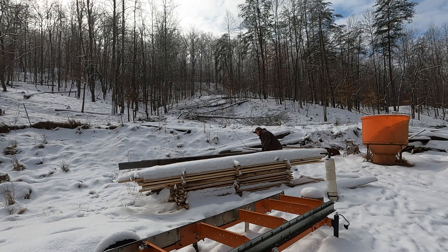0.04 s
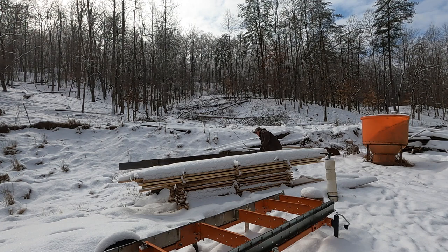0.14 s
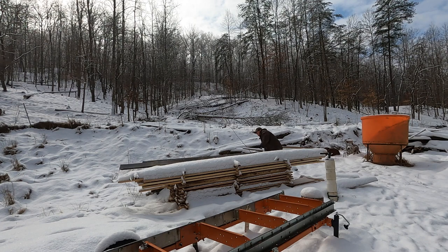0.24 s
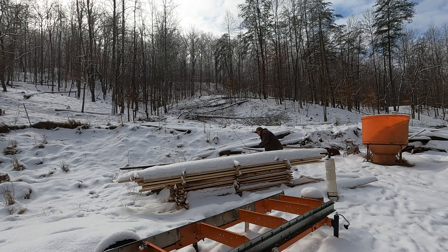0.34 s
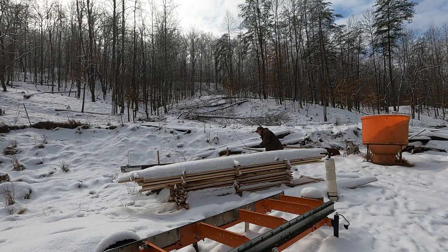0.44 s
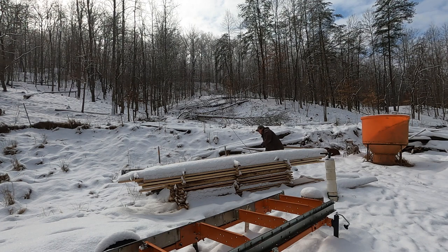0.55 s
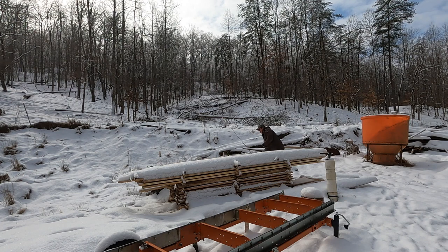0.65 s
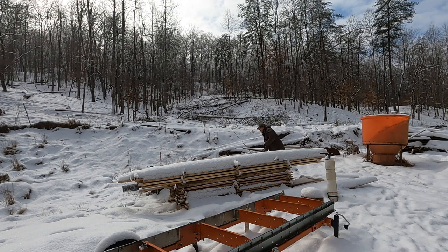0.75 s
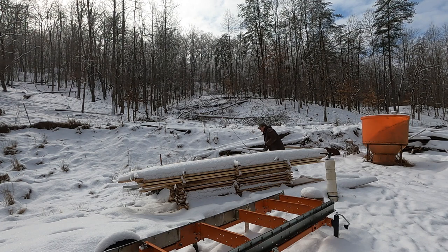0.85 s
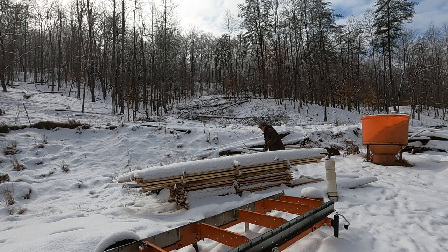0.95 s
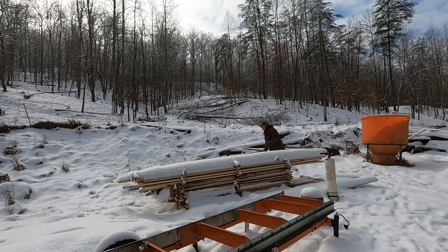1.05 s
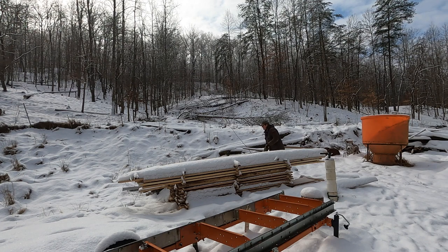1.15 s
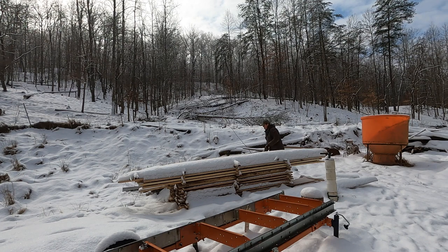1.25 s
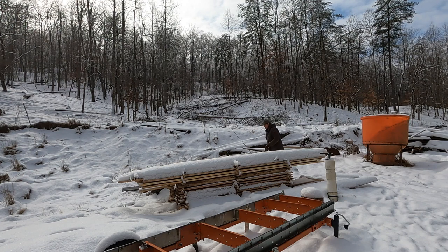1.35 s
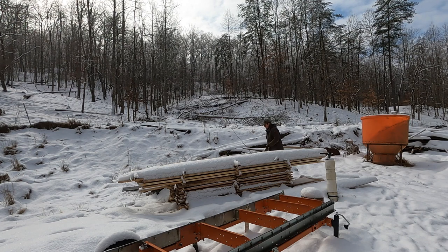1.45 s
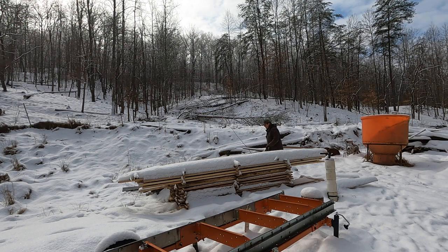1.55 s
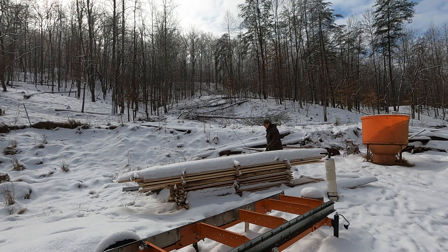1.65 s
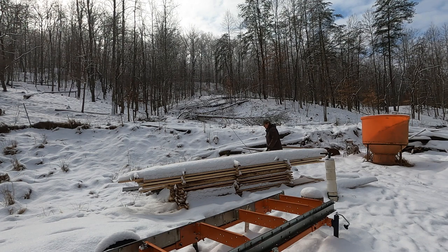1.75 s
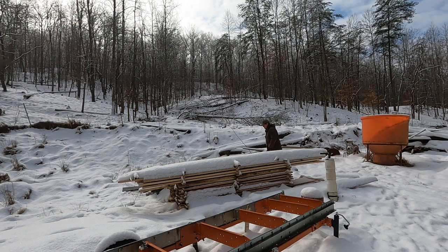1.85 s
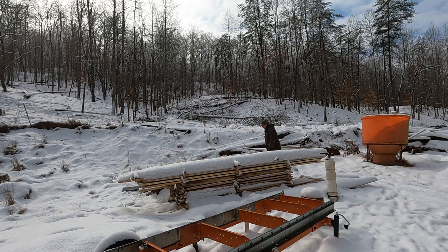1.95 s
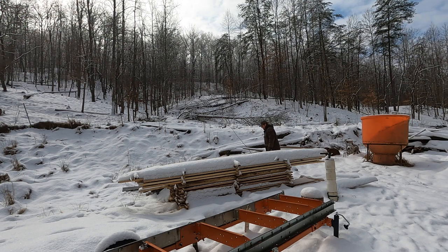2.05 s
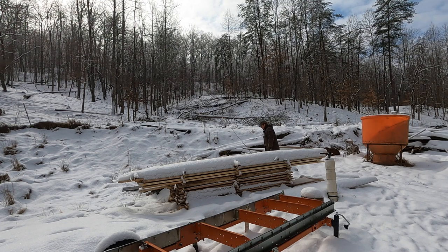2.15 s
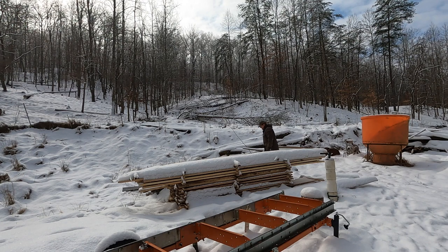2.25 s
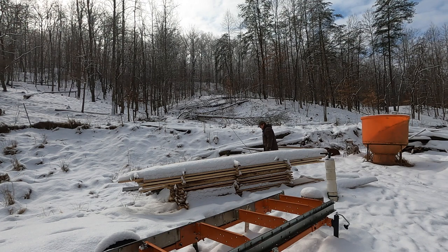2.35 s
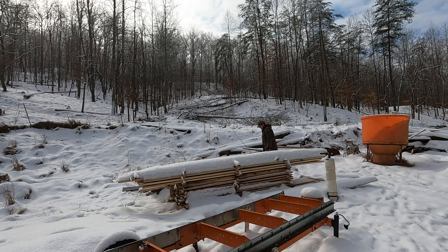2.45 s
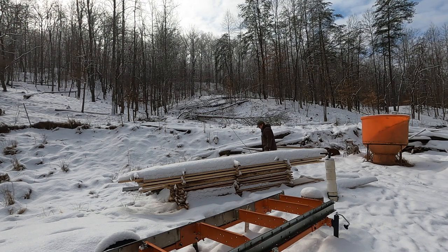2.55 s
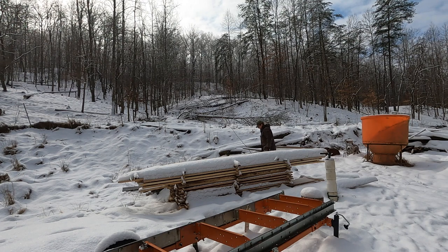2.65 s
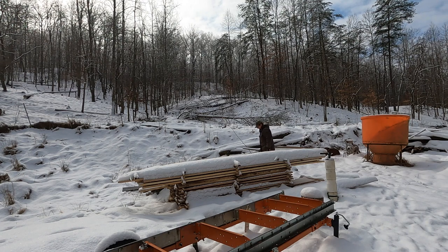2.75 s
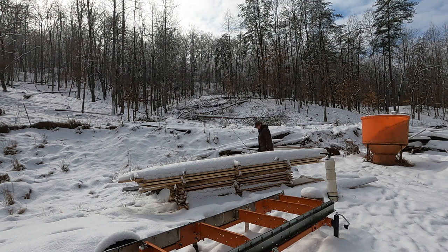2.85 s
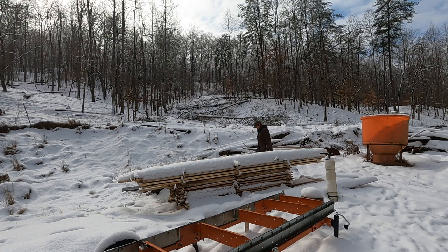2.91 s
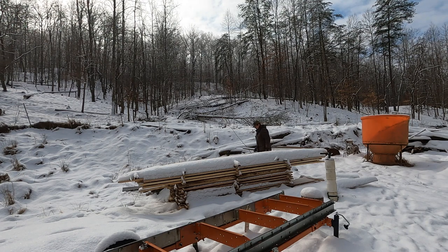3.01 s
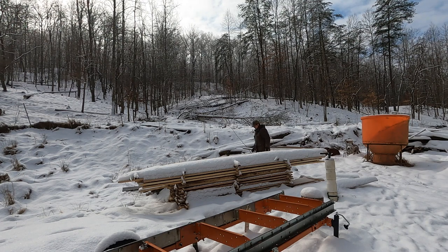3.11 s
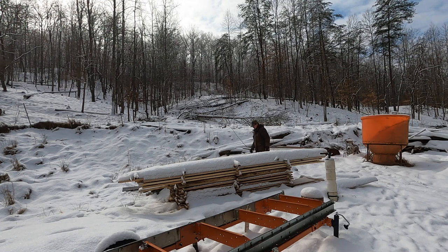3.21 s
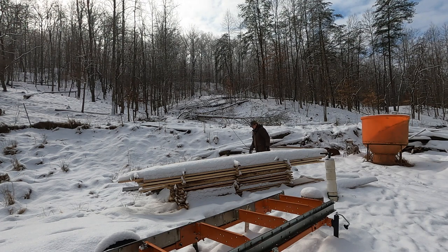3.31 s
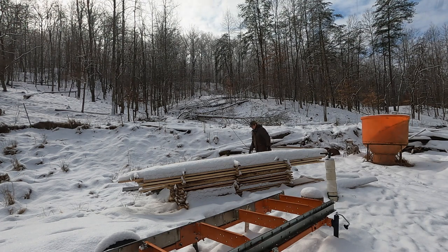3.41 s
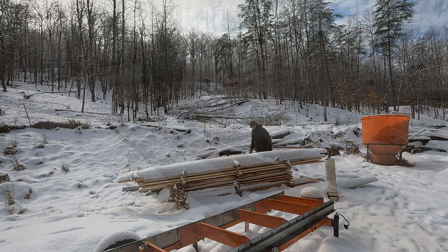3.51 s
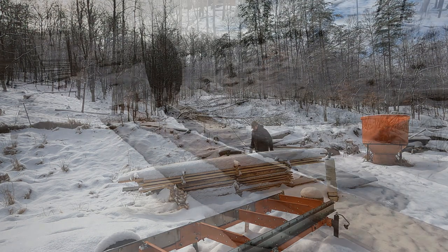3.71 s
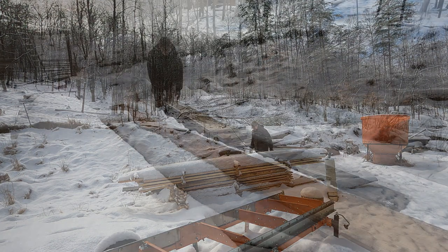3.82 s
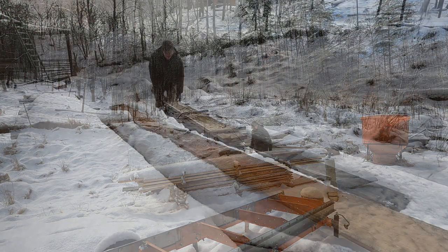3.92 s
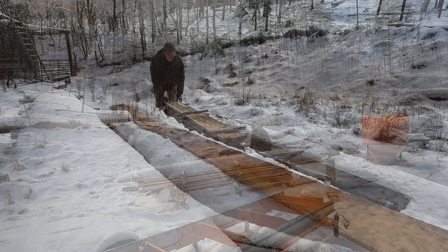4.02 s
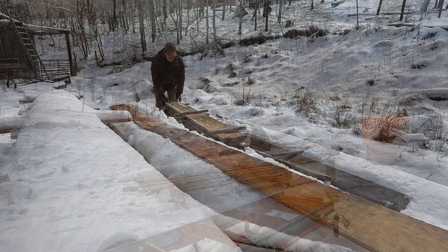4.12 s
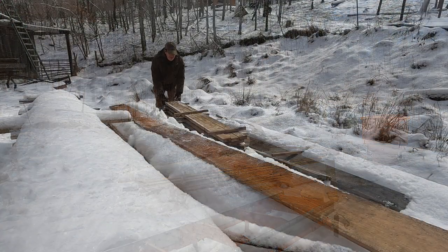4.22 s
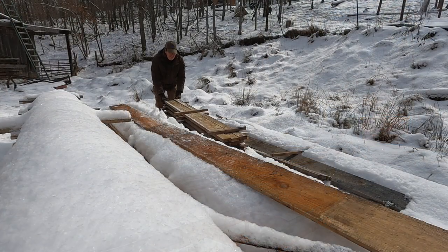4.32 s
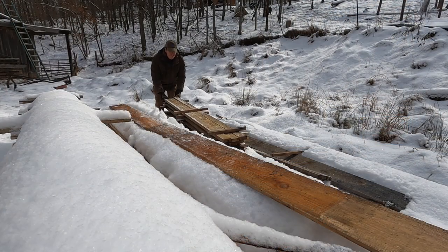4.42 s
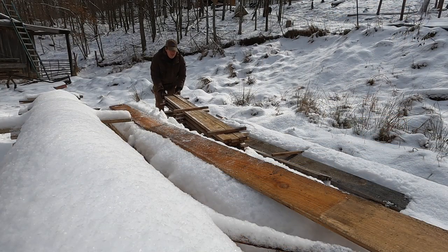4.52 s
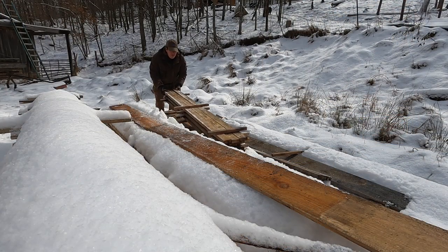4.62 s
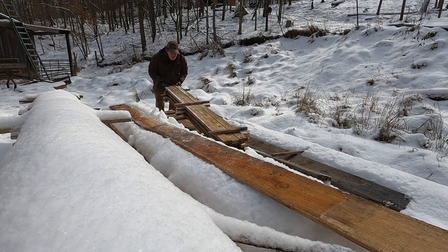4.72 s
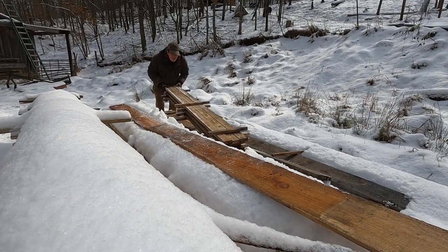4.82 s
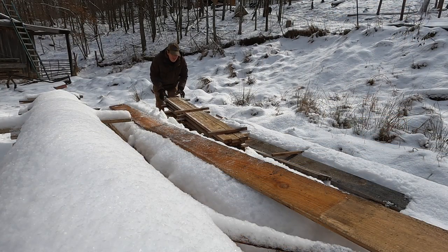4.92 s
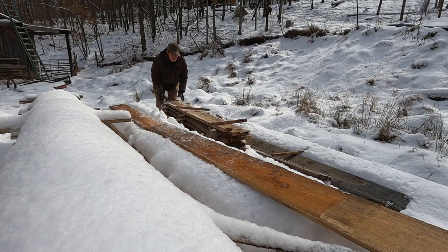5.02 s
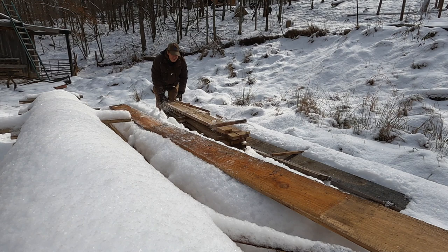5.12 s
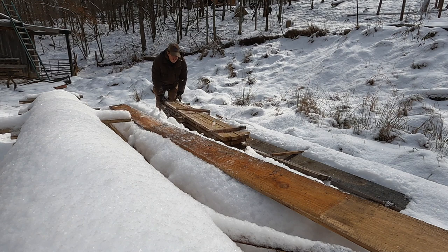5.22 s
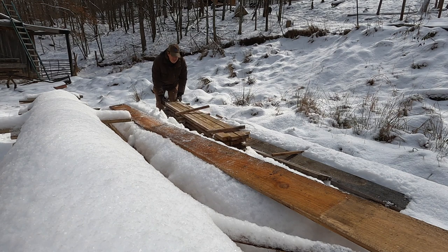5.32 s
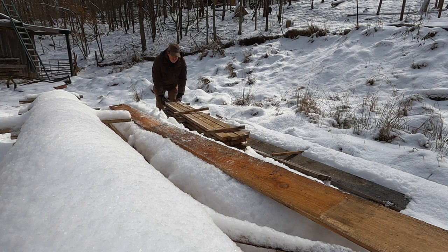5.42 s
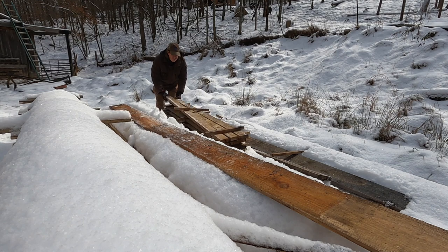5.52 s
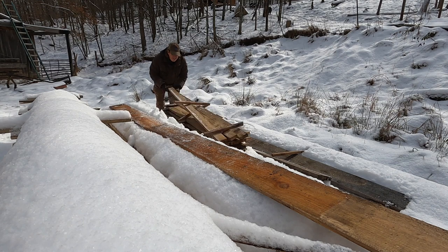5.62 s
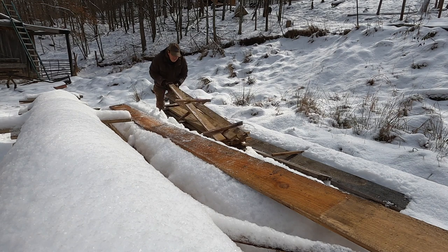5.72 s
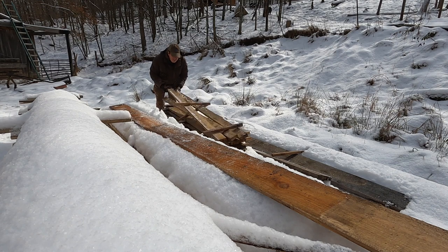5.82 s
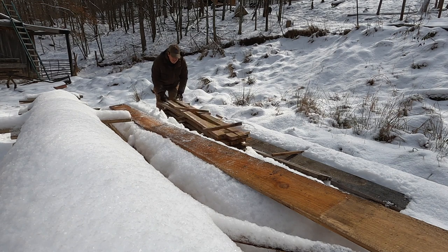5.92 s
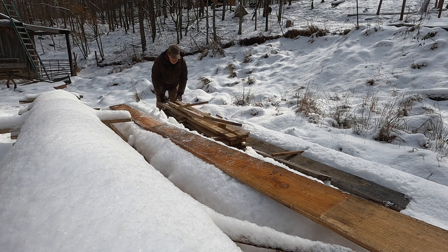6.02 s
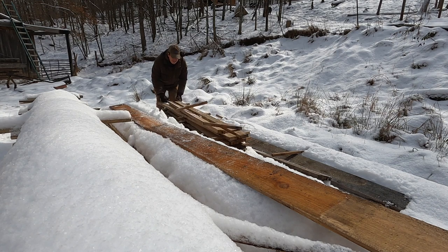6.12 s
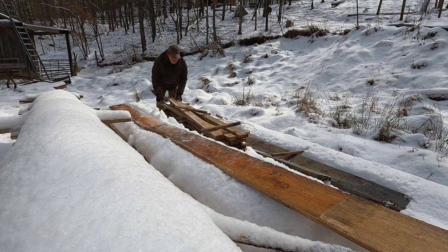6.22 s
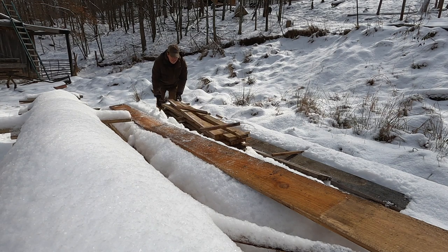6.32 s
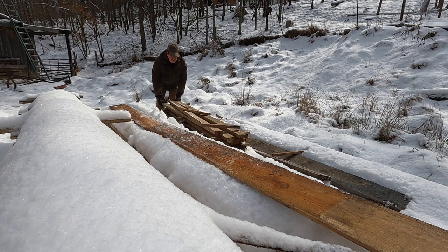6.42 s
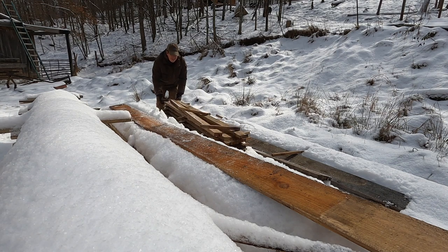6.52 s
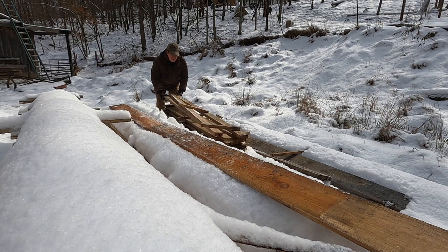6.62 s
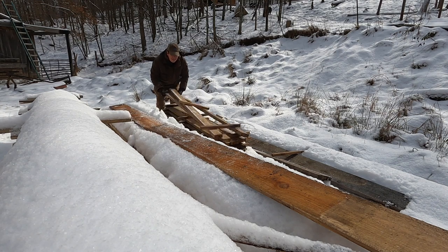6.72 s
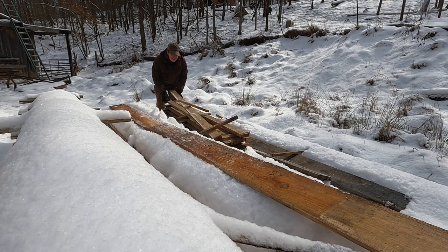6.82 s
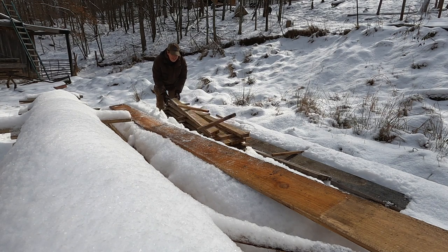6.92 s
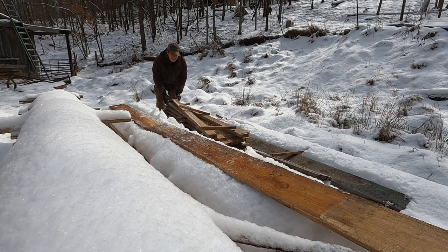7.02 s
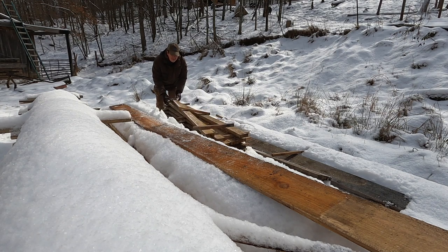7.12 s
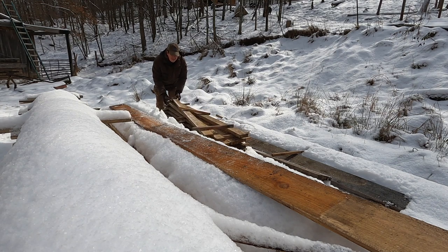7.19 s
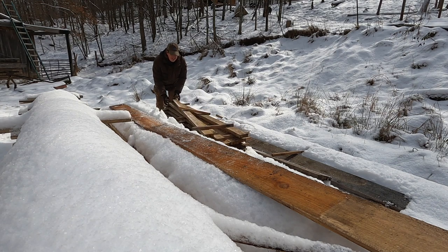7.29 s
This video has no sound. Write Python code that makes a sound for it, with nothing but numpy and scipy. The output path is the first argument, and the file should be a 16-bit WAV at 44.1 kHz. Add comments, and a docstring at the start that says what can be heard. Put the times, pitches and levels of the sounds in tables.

```python
"""A quiet snowy wood close to a lumber pile: steady hush, wind buffeting the microphone, boots in the snow.
Rough boards and slats are soon dragged and dropped: blows ring wood modes, bright grains crack, low modes thud.
Between blows loose slats rattle and slide as streams of tiny contacts; a calmer stretch leaves shuffling boots.
Small knocks then lead into a second, heavy volley of blows, cracks and thuds that lasts almost to the end."""
import sys
import numpy as np
from scipy import signal
from scipy.fft import rfft, irfft, next_fast_len
from scipy.io import wavfile

SR = 44100
rng = np.random.default_rng(int(sys.argv[2]) if len(sys.argv) > 2 else 0)


def wav_record(signal):
    """Record a signal, one row per channel, as 16-bit PCM in the file named by sys.argv[1]."""
    frames = np.transpose(np.atleast_2d(signal))
    bounded = np.clip(frames, -1, 1)
    # unit amplitude maps onto the largest positive 16-bit level
    quanta = np.round(bounded * 32767).astype(np.int16)
    wavfile.write(sys.argv[1], SR, quanta)


N = 324135

# Ringing modes of the boards. Each row: pitch in Hz, width in Hz for a blow, relative level in dB.
WOOD_MODES = [(323.6, 14, 6.5), (451.8, 25, 7), (597, 55, 4.5), (727, 52, 5), (916, 45, 4.5),
              (1048.4, 77.6, 4.5), (1261, 181, 1.5), (1385, 72, 2), (1658, 210, 1.5), (2022, 83, 4),
              (2210, 158, 1.5)]


def amp(db):
    """Turn dB into gain."""
    return 10 ** (np.asarray(db) / 20)


def rms_one(x):
    """Scale to rms 1."""
    return x / np.sqrt(np.mean(x ** 2) + 1e-20)


def in_time(rows):
    """Draw each column of a table as a curve, sample by sample; the first column is seconds."""
    s, *columns = np.transpose(rows)
    return [np.interp(np.arange(N) / SR, s, c) for c in columns]


def at_hz(points, hz):
    """Read a table of frequencies and values on a log-frequency axis."""
    table = np.array(points, float)
    return np.interp(np.log(hz + 1), np.log(table[:, 0] + 1), table[:, 1])


def colour(x, response):
    """Filter by a function of frequency."""
    size = next_fast_len(x.shape[-1])
    hz = np.arange(size // 2 + 1) * SR / size
    return irfft(rfft(x, size) * response(hz), size)[..., :x.shape[-1]]


def band(x, low_hz, high_hz):
    """Keep one band of frequencies."""
    return signal.sosfilt(signal.butter(2, [low_hz, high_hz], "band", fs=SR, output="sos"), x)


def resonate(x, hz, width_hz):
    """Ring one resonance, with gain 1 on top."""
    r = np.exp(-np.pi * width_hz / SR)
    feedback = [1, -2 * r * np.cos(2 * np.pi * hz / SR), r * r]
    return signal.lfilter([(1 - r * r) / 2, 0, (r * r - 1) / 2], feedback, x)


def grains(size, per_s, spread_db):
    """Scatter tiny contacts at random times, with random sign and a size spread in dB."""
    sizes = amp(spread_db * np.minimum(rng.exponential(1, size), 4)) * rng.choice([-1, 1], size)
    return sizes * (rng.random(size) < per_s / SR) + 1e-18


def dying(size, t60, rise=1e-4):
    """Shape a quick rise and an exponential decay; t60 and rise in seconds."""
    t = np.arange(size) / SR
    return amp(-60 * t / np.clip(t60, .003, 1)) * (1 - np.exp(-(t + 1e-5) / max(rise, 1e-5)))


def dulled(x):
    """The treble of a ring falls away steeply above 2600 Hz."""
    return signal.sosfilt(signal.butter(3, 2600, fs=SR, output="sos"), x)


def add(out, s, db, sound):
    """Place one event at s seconds with its peak at db."""
    i = max(round(s * SR), 0)
    out[i:i + len(sound)] += (amp(db) * sound / np.max(np.abs(sound)))[:N - i]


def air():
    """The steady hush of the wood is coloured noise, partly its own at each microphone port."""
    # Each row: frequency in Hz, relative level in dB.
    hush_colour = [(71, -49.5), (120, -10), (162, 14.5), (269, -7.5), (835, -9.5), (1090, -4), (2070, 0.5),
                   (3040, -26), (6820, -14), (15000, -59)]
    mid, side = colour(rng.standard_normal((2, N)), lambda f: amp(at_hz(hush_colour, f)))
    return amp(-66.5) * rms_one(mid + .5 * side * [[1], [-1]])


def stirring():
    """Levels of rattle, hiss and rumble: the loudest of background, jolts and steps at each moment."""
    # Faint background level. Each row: time in seconds, rattle, hiss and rumble levels in dB.
    background = [(0.0, -57, -66.5, -75), (1.4, -56, -72, -57.5), (2.3, -73.5, -82.5, -78),
                  (3.4, -94, -78, -79.5), (3.75, -69, -72, -64.5), (5.0, -63, -64, -62.5),
                  (5.55, -61, -64, -64), (6.0, -54.5, -63, -74), (6.85, -63, -63, -61.5),
                  (7.35, -66.5, -77, -66)]
    # The pile is jolted and its loose slats settle. Each row: time in seconds, rattle level in dB,
    # sliding hiss level in dB, low rumble level in dB, time in seconds for the rattle to settle 60 dB.
    jolts = [(0.182, -35, -50.5, -39, 0.65), (0.388, -34, -47, -47.5, 1.05),
             (0.54, -32, -42.5, -35.5, 0.83), (0.694, -25.5, -46.5, -25.5, 1.7),
             (0.761, -21, -33.5, -34, 0.28), (0.94, -24.5, -42, -24, 0.48), (1.232, -41.5, -51.5, -39, 0.5),
             (1.51, -46, -68, -42.5, 0.53), (1.931, -54, -81, -54, 0.69),
             (2.401, -66.5, -64.5, -76.5, 0.54), (3.25, -58, -67, -47.5, 0.44),
             (4.332, -45, -54, -49, 0.52), (5.11, -26.5, -45, -24.5, 1.53),
             (5.268, -20.5, -46.5, -29.5, 0.56), (5.629, -37, -50, -41, 0.42), (5.76, -46, -60, -54.5, 1.6),
             (6.059, -30.5, -50, -30, 1.15), (6.27, -50.5, -59.5, -38, 1.2), (6.67, -48, -56, -45.5, 0.45),
             (6.909, -55, -59.5, -47.5, 1.5), (6.987, -27.5, -50.5, -30, 2)]
    # Boots shuffle in the snow. Each row: loudest moment in seconds, crunch (sounded by the rattle), hiss and
    # rumble levels in dB, time in seconds for the crunch to swell or fade 60 dB.
    steps = [(0.0, -52.5, -72, -48.5, 0.24), (1.801, -70.5, -84, -58, 0.64),
             (2.189, -64.5, -85, -45.5, 0.43), (2.97, -59, -68.5, -54.5, 0.8),
             (3.621, -59, -77.5, -54.5, 0.34), (3.902, -59.5, -61.5, -52.5, 0.82),
             (4.057, -62, -60, -54, 1.2), (4.698, -61, -69, -45, 0.25), (4.841, -64.5, -58.5, -63, 1.8)]
    jolt_rise_s = 0.095   # for a 60 dB rise
    haste = np.array([[1], [1.2], [1.55]])   # hiss and rumble settle faster than the rattle
    t = np.arange(N) / SR
    levels = np.array(in_time(background))
    for s, *db, t60 in jolts:
        fall = np.where(t < s, (s - t) / jolt_rise_s, haste * (t - s) / t60)
        levels = np.maximum(levels, np.c_[db] - 60 * fall)
    for s, *db, t60 in steps:
        fall = haste * np.abs(t - s) / t60
        levels = np.maximum(levels, np.c_[db] - 60 * fall)
    return levels


def wind():
    """Lumpy low pressure swings on the microphone come from the wind and from the shaken ground."""
    # Each row: time in seconds, wind level in dB.
    gust_levels = [(0.0, -53), (0.14, -75), (0.24, -46), (0.45, -47), (1.1, -48), (1.4, -83), (2.5, -96.5),
                   (2.8, -72), (3.7, -63.5), (4.0, -50), (4.2, -72), (4.45, -39.5), (4.75, -32), (5.0, -47),
                   (5.45, -38), (5.58, -62), (5.95, -49), (6.62, -53.5), (6.85, -46.5), (7.35, -65)]
    gust_db, = in_time(gust_levels)
    lumps = amp(3.8 * rms_one(band(rng.standard_normal(N), 3.74, 7.9)))
    swings = band(rng.standard_normal(N), 14.5, 71)
    gusts = lumps * band(band(swings, 16, 110), 8, 99)
    shake = band(band(rng.standard_normal(N), 33, 110), 18, 130)
    rumble_db = stirring()[2]
    shake_db = 3 + 1.363 * rumble_db   # hard jolts shake the ground most
    return amp(gust_db) * rms_one(gusts) + amp(shake_db) * rms_one(shake)


def rattle():
    """Small contacts each ring a few modes of the wood, hiss along its rough face and rumble in the pile."""
    # Snow and grit sliding. Each row: frequency in Hz, relative level in dB.
    slide_colour = [(1530, -35), (2600, -1.5), (4160, -4.5), (5700, -3.5), (12300, -25), (15000, -44)]
    # The band of the pile's rumble: low edge in Hz, high edge in Hz.
    rumble_band = (100, 360)
    level_db, hiss_db, rumble_db = stirring()

    contacts = grains(N, per_s=1600, spread_db=3.0)
    # light touches barely stir the deep modes, heavy ones sound darker
    heavy = np.clip((level_db + 69.5) / 16, .12, 1)
    wood = np.zeros(N)
    for k, (hz, width_hz, db) in enumerate(WOOD_MODES):
        touches = contacts * (rng.random(N) < 1 / 4) + 1e-18   # a quarter of the contacts reach each mode
        ring = amp(db) * (-1) ** k * resonate(touches, hz, 1.54 * width_hz)
        if hz < 950:
            ring = ring * heavy
        elif hz > 1500:
            ring = ring * (1 - 0.55 * heavy)
        wood += ring
    wood = dulled(wood)

    # the rough face grips and lets go
    catching = amp(1.84 * rms_one(band(rng.standard_normal(N), 29, 140)))
    sliding = catching * grains(N, per_s=20000, spread_db=4.5)
    hiss = colour(sliding, lambda f: amp(at_hz(slide_colour, f)))

    bumps = grains(N, per_s=500, spread_db=4.0)
    rumble = band(band(bumps, *rumble_band), *rumble_band)
    return amp(level_db) * rms_one(wood) + amp(hiss_db) * rms_one(hiss) + amp(rumble_db) * rms_one(rumble)


def knocks(focus_db=5, detune=.01):
    """A blow is a dying chatter of contacts; each rings the wood modes a little off, most near its own pitch."""
    # Wood on wood. Each row: start in seconds, peak in dB, favoured pitch in Hz, chatter t60 in seconds.
    blows = [(0.148, -17, 810, 0.086), (0.182, -21, 683, 0.11), (0.273, -29.5, 630, 0.093),
             (0.383, -33, 680, 0.17), (0.5, -21.5, 937, 0.098), (0.538, -11, 1840, 0.11),
             (0.681, -22, 900, 0.083), (0.719, -17.5, 1503, 0.24), (0.751, -13, 1486, 0.17),
             (0.79, -14, 794, 0.083), (0.93, -10.5, 990, 0.025), (0.992, -21.5, 1160, 0.44),
             (1.054, -20.5, 1144, 0.061), (1.273, -31, 504, 0.067), (1.505, -26.5, 1135, 0.062),
             (1.507, -37, 2050, 0.022), (1.735, -49, 2400, 0.07), (1.923, -27, 1900, 0.045),
             (2.399, -53.5, 1930, 0.12), (2.925, -45.5, 1510, 0.071), (3.152, -42.5, 1090, 0.041),
             (3.192, -41, 1405, 0.18), (3.255, -33, 1132, 0.057), (4.314, -32.5, 2120, 0.05),
             (4.343, -29, 626, 0.034), (4.387, -39, 490, 0.061), (4.414, -25.5, 2055, 0.073),
             (4.626, -41, 410, 0.1), (4.692, -34.5, 634, 0.064), (4.712, -41, 376, 0.069),
             (4.803, -42.5, 865, 0.16), (5.012, -33.5, 850, 0.14), (5.101, -7, 810, 0.065),
             (5.119, -7, 1020, 0.14), (5.198, -17, 1617, 0.25), (5.256, -11, 1238, 0.094),
             (5.29, -9.5, 1320, 0.038), (5.333, -14.5, 1280, 0.096), (5.349, -9, 920, 0.031),
             (5.423, -24.5, 906, 0.094), (5.618, -23, 1220, 0.11), (5.649, -31.5, 586, 0.099),
             (5.755, -27.5, 770, 0.042), (6.017, -22.5, 616, 0.045), (6.032, -13.5, 590, 0.086),
             (6.075, -7.5, 581, 0.11), (6.086, -11, 1590, 0.054), (6.145, -21, 576, 0.13),
             (6.179, -12.5, 1276, 0.073), (6.286, -20.5, 1170, 0.016), (6.294, -21.5, 1670, 0.038),
             (6.336, -29, 2240, 0.04), (6.399, -18, 1293, 0.054), (6.467, -28.5, 1990, 0.16),
             (6.517, -24.5, 746, 0.067), (6.682, -34, 1360, 0.072), (6.909, -37, 540, 0.1),
             (6.973, -9, 717, 0.072), (6.989, -9.5, 1350, 0.12), (7.008, -9, 1310, 0.067),
             (7.076, -20, 623, 0.2), (7.112, -14, 874, 0.26), (7.173, -22.5, 560, 0.15),
             (7.257, -34, 706, 0.086)]
    out = np.zeros(N)
    for s, db, hz, t60 in blows:
        chatter = grains(size=8000, per_s=2500, spread_db=3.0) * dying(size=8000, t60=t60, rise=0.0011)
        chatter[20] = 0.22 / t60   # a brief blow is mostly one clean strike
        draw = rng.standard_normal((len(WOOD_MODES), 2))
        sound = amp(7.5) * resonate(chatter, hz, hz / 24)
        for k, ((f, width_hz, mode_db), (a, b)) in enumerate(zip(WOOD_MODES, draw)):
            octaves_off = abs(np.log2(f / hz))
            gain = amp(mode_db - focus_db * octaves_off + 2.33 * a) * (-1) ** k
            sound += gain * resonate(chatter, f * (1 + detune * b), width_hz)
        add(out, s, db, dulled(sound))
    return out


def cracks():
    """Crust and splinters crack as short bursts of bright grains with one small random resonance."""
    # Each row: start in seconds, peak in dB.
    snaps = [(0.149, -32.5), (0.183, -39), (0.28, -36.5), (0.534, -13.5), (0.754, -21.5), (0.924, -31),
             (1.421, -47.5), (4.29, -40), (4.3146, -37), (4.34, -38), (4.387, -33.5), (4.4115, -20),
             (4.8002, -39), (5.014, -33.5), (5.0893, -23.5), (5.1272, -22), (5.216, -39), (5.261, -25),
             (5.2857, -22.5), (5.342, -19.5), (5.422, -34.5), (5.616, -30.5), (5.6468, -25.5),
             (5.682, -30.5), (5.754, -34.5), (5.808, -46), (5.838, -41.5), (6.015, -24), (6.032, -24.5),
             (6.0728, -18.5), (6.109, -34), (6.148, -35.5), (6.1756, -34.5), (6.246, -35), (6.335, -28.5),
             (6.3993, -40), (6.4687, -48), (6.517, -39.5), (6.681, -43), (6.984, -28), (7.007, -24.5),
             (7.0693, -38), (7.1136, -30.5), (7.136, -27.5), (7.166, -37), (7.1925, -37.5), (7.277, -43)]
    # Each row: frequency in Hz, relative level in dB.
    crack_colour = [(1530, -18), (2600, -2), (4220, -8), (5410, -7), (8040, -20), (11900, -31.5),
                    (15000, -49)]
    out = np.zeros(N)
    for s, db in snaps:
        snap = grains(size=3000, per_s=10000, spread_db=-0.5) * dying(size=3000, t60=0.043, rise=0.00086)
        bright = colour(snap, lambda f: amp(at_hz(crack_colour, f)))
        add(out, s, db, bright + 2.4 * resonate(bright, rng.uniform(2740, 6900), 500))
    return out


def thuds(cycles=12.4):
    """A soft push rings a low mode of the pile with two neighbours; deeper ones last longer."""
    # Dull thuds of the pile and of boots. Each row: start in seconds, peak in dB, pitch in Hz.
    pushes = [(0.189, -32, 45.7), (0.68, -11, 114.5), (0.71, -11.5, 127), (0.847, -20, 68.6),
              (0.916, -18, 114), (0.95, -12.5, 139.6), (1.03, -12, 144), (1.224, -29, 135),
              (1.239, -29, 131), (1.317, -39, 130), (1.455, -35.5, 317), (1.511, -32, 297),
              (1.924, -40, 280.5), (2.988, -42, 159), (3.201, -38, 215), (3.261, -34.5, 158),
              (3.432, -43.5, 35.4), (3.592, -39, 63.2), (4.001, -41, 39), (4.341, -40.5, 207),
              (4.627, -40, 220), (4.645, -24.5, 56), (4.78, -24, 50), (5.123, -14.5, 394),
              (5.131, -10.5, 113), (5.269, -20.5, 62.6), (6.076, -19.5, 210), (6.984, -16, 318),
              (7.02, -22.5, 108)]
    out, t = np.zeros(N), np.arange(12000) / SR
    for s, db, hz in pushes:
        low, high = rng.uniform([.45, 1.4], [.7, 2.2])   # neighbours as multiples of the pitch
        sound = np.sin(2 * np.pi * hz * t)
        sound += 0.37 * np.sin(2 * np.pi * low * hz * t)
        sound += 0.21 * np.sin(2 * np.pi * high * hz * t)
        add(out, s, db, -sound * dying(len(t), 0.019 + cycles / (hz + 60), rise=0.0027))
    return out


def outdoors(x):
    """The snow and the nearest trunks return dull echoes."""
    # Each row: delay in seconds, level in dB.
    echoes = [(.007, -15.5), (.019, -16)]
    dull = signal.lfilter([.4], [1, -.6], x)
    out = x.copy()
    for delay, db in echoes:
        lag = round(delay * SR)
        out[lag:] += amp(db) * dull[:-lag]
    return out


def ports(x):
    """Two microphone ports hear one sound with a lean, a lag and a small unalike part."""
    # Each row: frequency in Hz, left minus right in dB.
    lean = [(125, -.4), (250, -1.7), (500, -3), (2000, -2.8), (4000, -2.5), (8000, 0), (12000, -2)]
    # Each row: frequency in Hz, phase in radians by which left leads.
    lead = [(300, 0), (1290, -.3), (2670, -1.5), (3960, -1.3), (4480, .4), (5430, 0), (15000, 0)]
    # Each row: frequency in Hz, level in dB of the part unalike in both ports.
    apart = [(30, -10), (125, -30), (1000, -15), (4000, -11), (9000, -15), (12000, -2)]
    scatter = rng.standard_normal(6000) * dying(size=6000, t60=.12)
    scattered = signal.fftconvolve(x, scatter / np.linalg.norm(scatter))[:N]
    unalike = colour(scattered, lambda f: amp(at_hz(apart, f)))
    # each port takes half of the lean and half of the lead
    left = colour(x, lambda f: amp(at_hz(lean, f) / 2) * np.exp(.5j * at_hz(lead, f)))
    right = colour(x, lambda f: amp(-at_hz(lean, f) / 2) * np.exp(-.5j * at_hz(lead, f)))
    return np.array([left + unalike, right - unalike])


def scene():
    """The pile and the wind reach both ports over the hush of the wood."""
    pile = outdoors(knocks() + cracks()) + thuds() + rattle()
    return ports(pile + wind()) + air()


def record(dry):
    """The top of the treble is cut steeply from 15600 Hz."""
    return signal.sosfilt(signal.cheby2(12, 60, 15600, fs=SR, output="sos"), dry)


dry = scene()
out = record(dry)
wav_record(out)
```